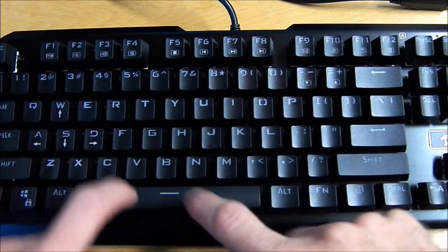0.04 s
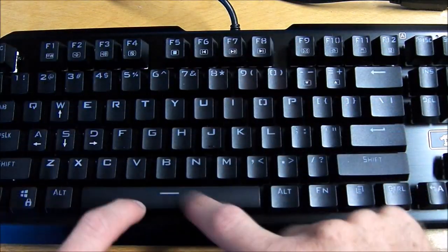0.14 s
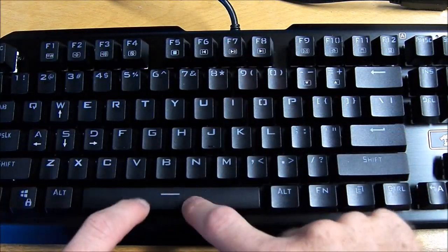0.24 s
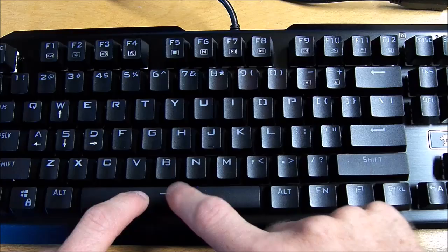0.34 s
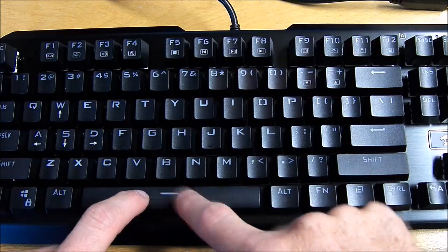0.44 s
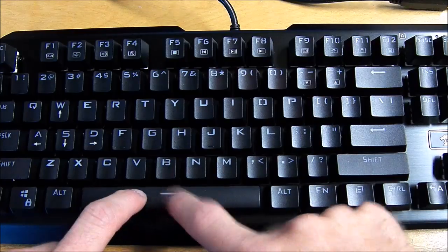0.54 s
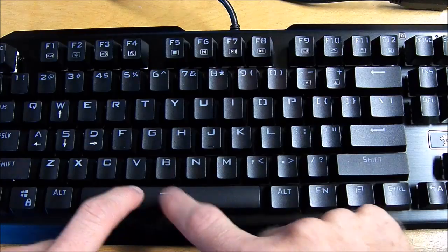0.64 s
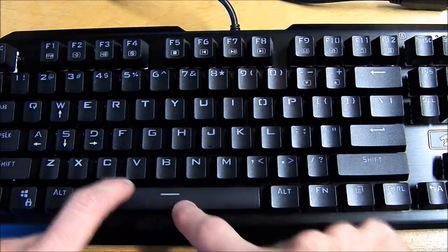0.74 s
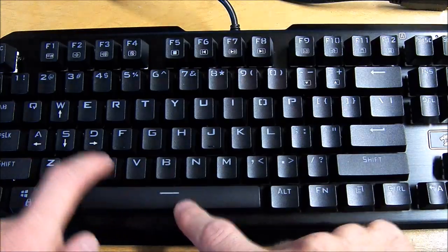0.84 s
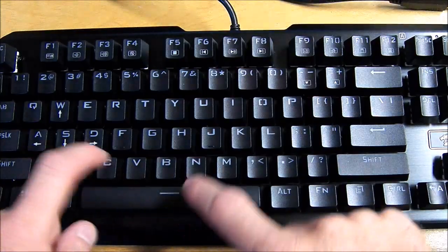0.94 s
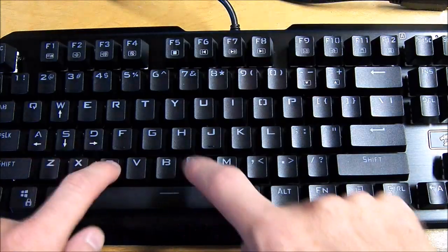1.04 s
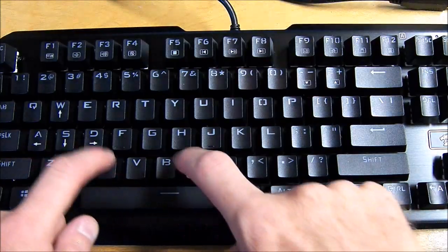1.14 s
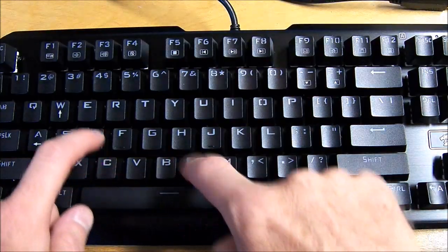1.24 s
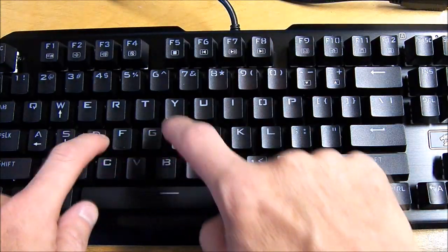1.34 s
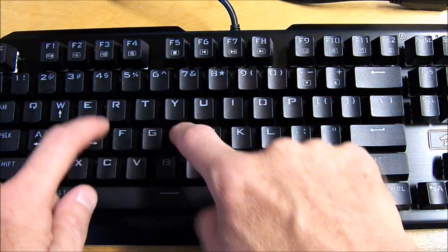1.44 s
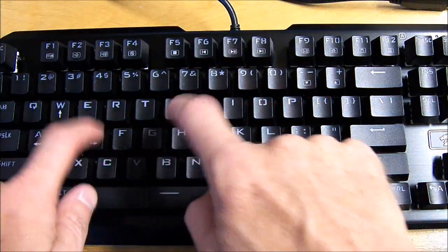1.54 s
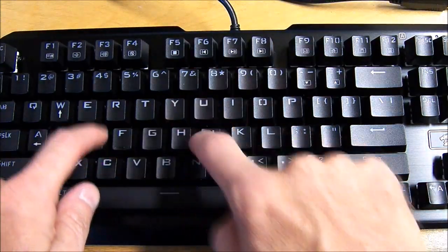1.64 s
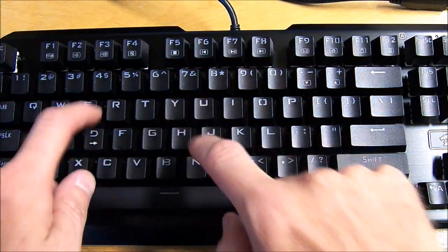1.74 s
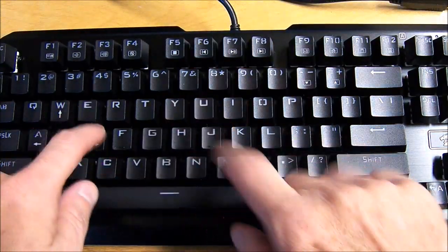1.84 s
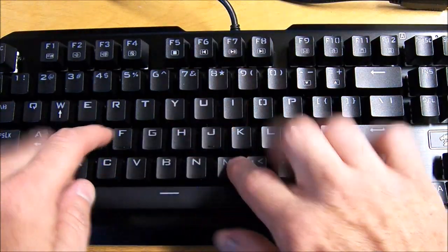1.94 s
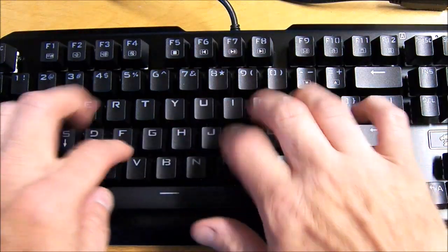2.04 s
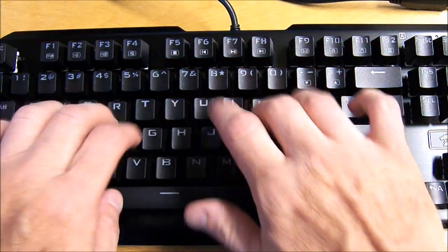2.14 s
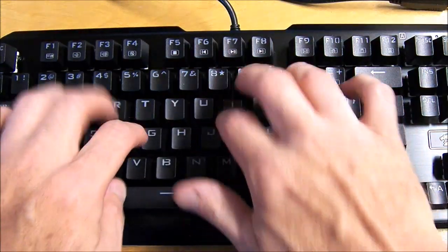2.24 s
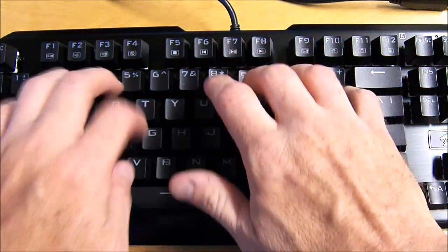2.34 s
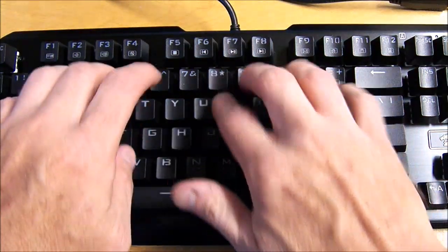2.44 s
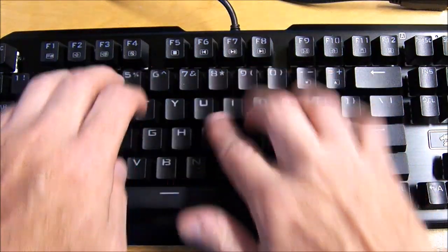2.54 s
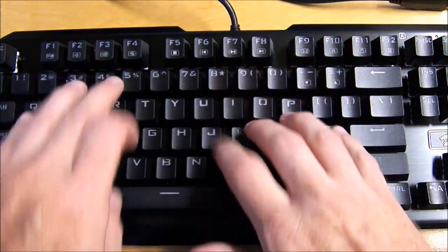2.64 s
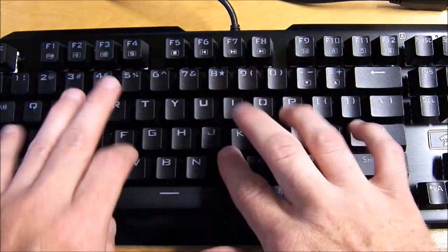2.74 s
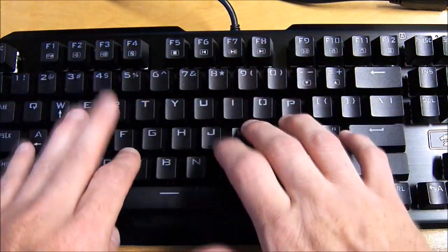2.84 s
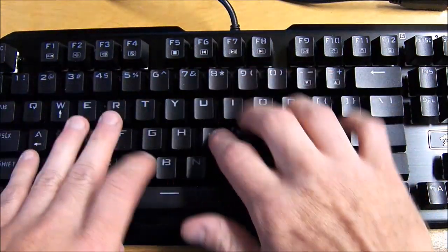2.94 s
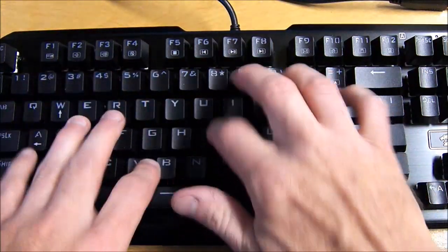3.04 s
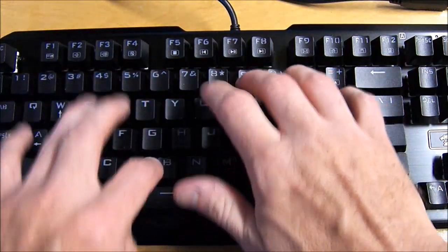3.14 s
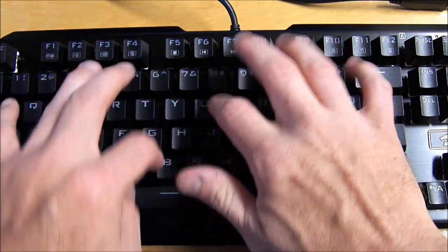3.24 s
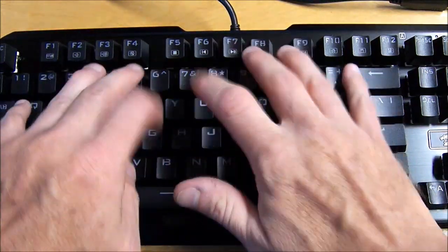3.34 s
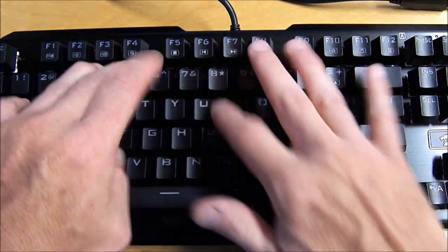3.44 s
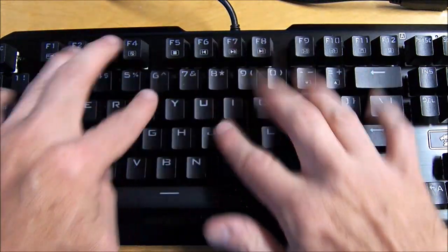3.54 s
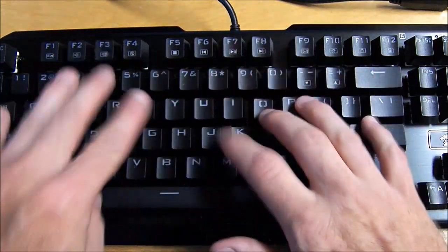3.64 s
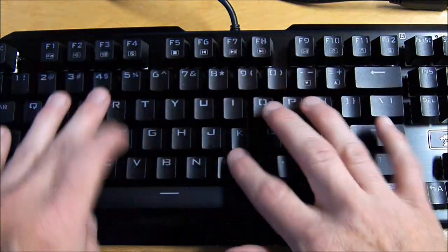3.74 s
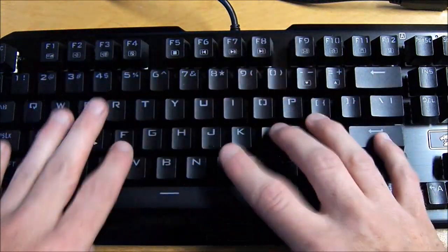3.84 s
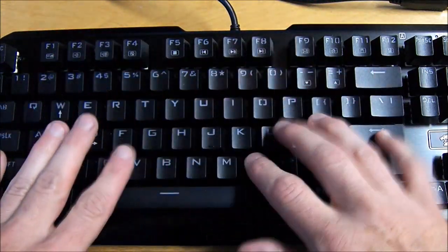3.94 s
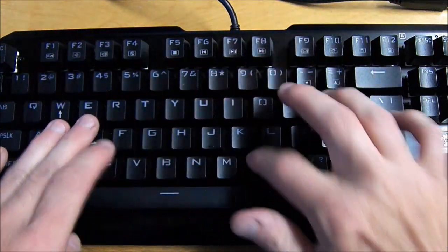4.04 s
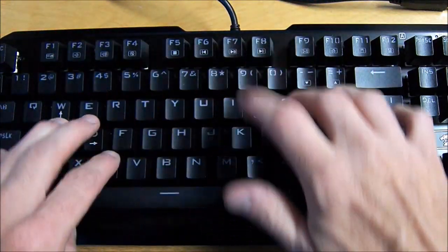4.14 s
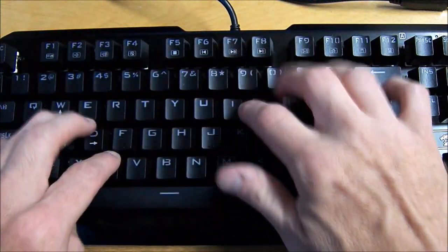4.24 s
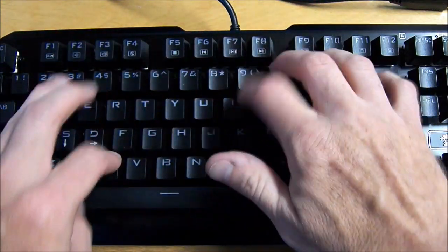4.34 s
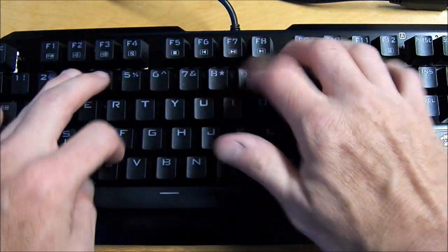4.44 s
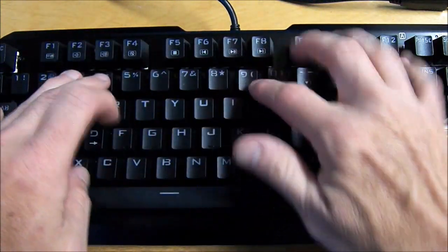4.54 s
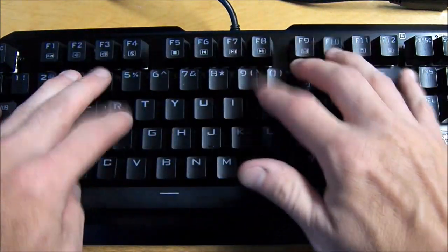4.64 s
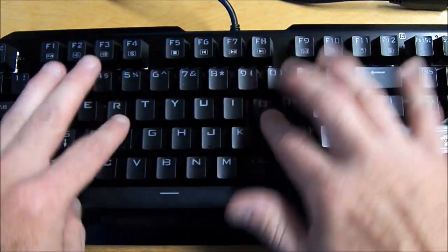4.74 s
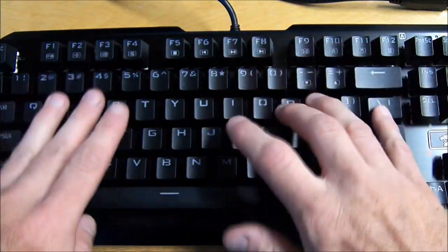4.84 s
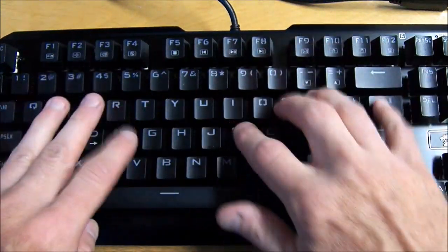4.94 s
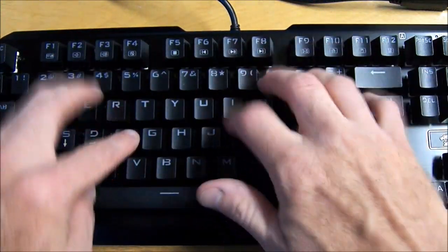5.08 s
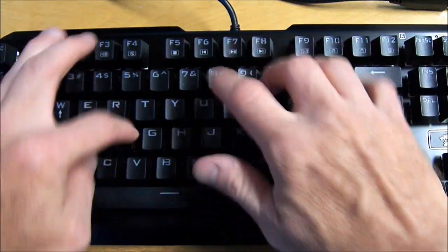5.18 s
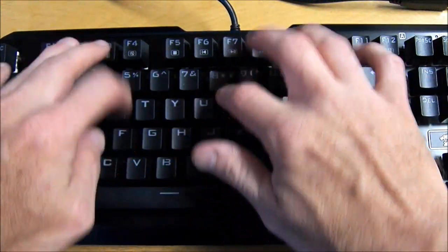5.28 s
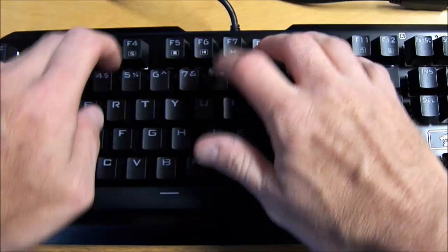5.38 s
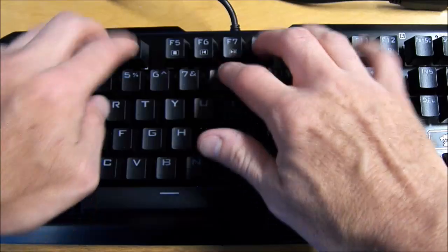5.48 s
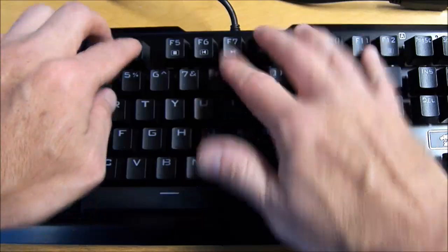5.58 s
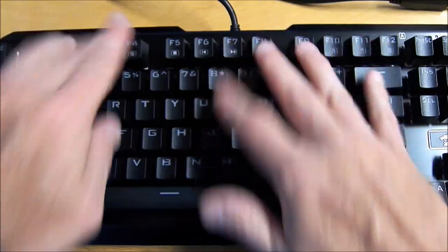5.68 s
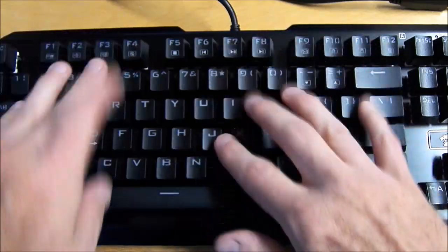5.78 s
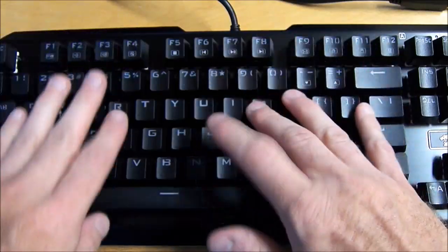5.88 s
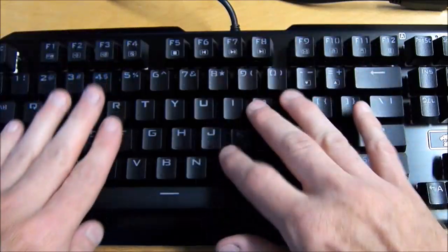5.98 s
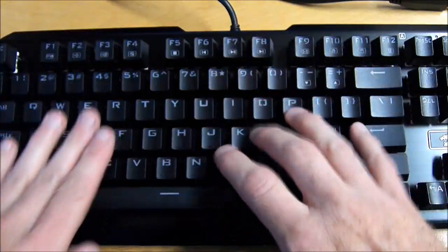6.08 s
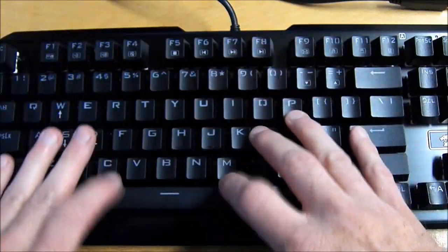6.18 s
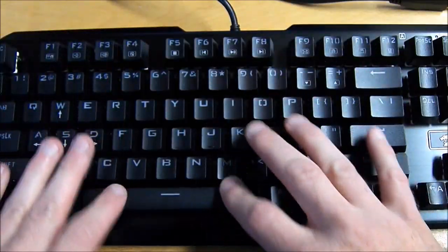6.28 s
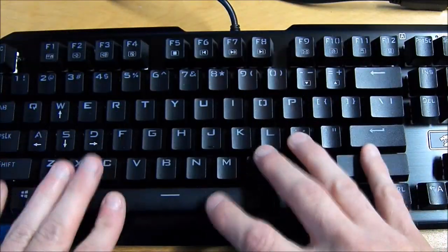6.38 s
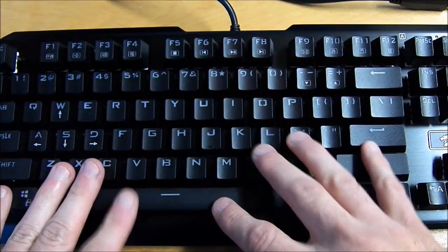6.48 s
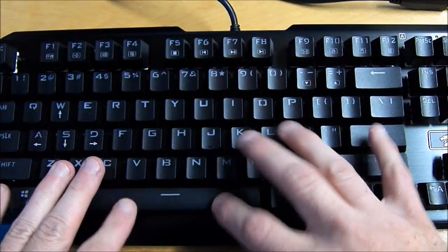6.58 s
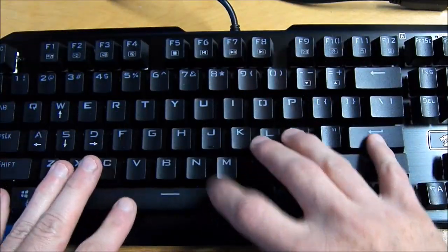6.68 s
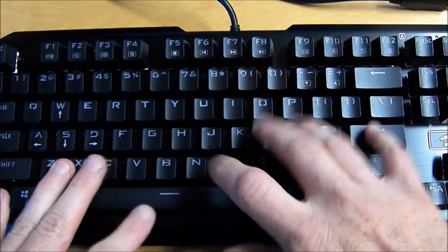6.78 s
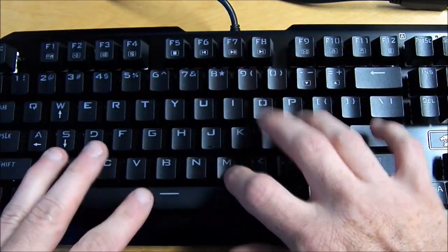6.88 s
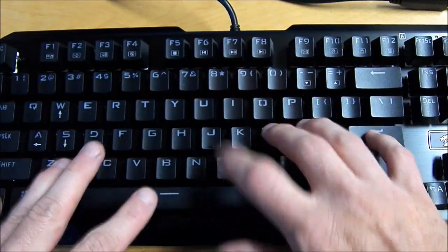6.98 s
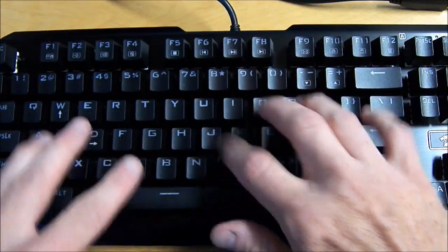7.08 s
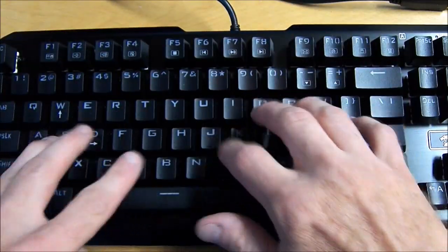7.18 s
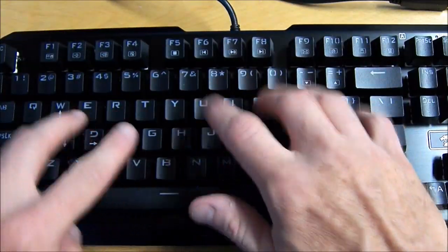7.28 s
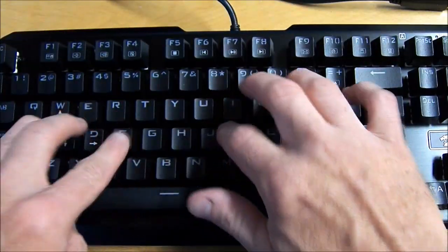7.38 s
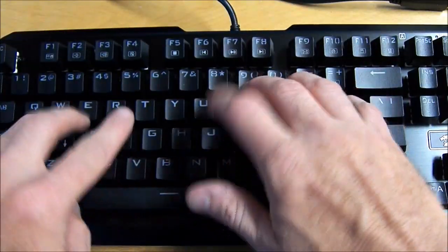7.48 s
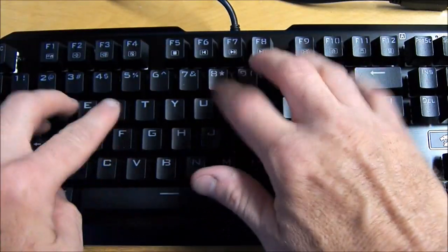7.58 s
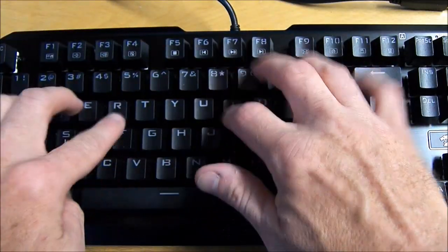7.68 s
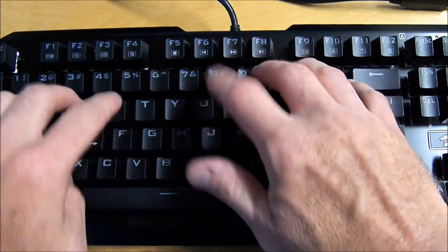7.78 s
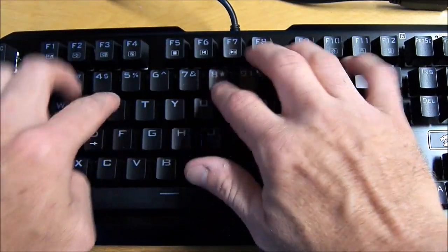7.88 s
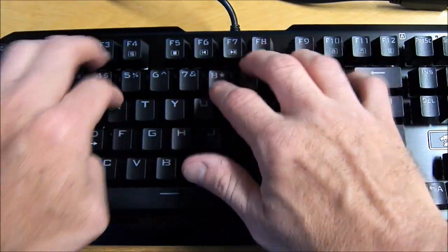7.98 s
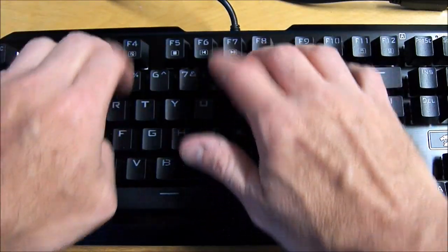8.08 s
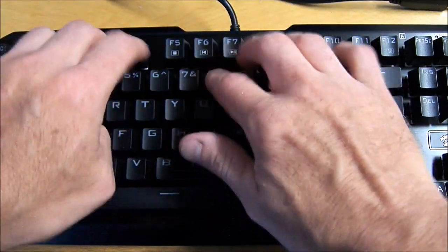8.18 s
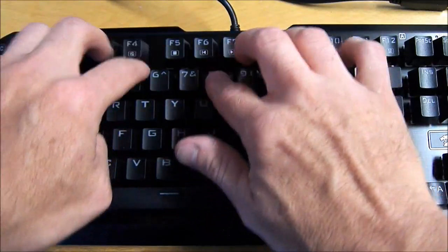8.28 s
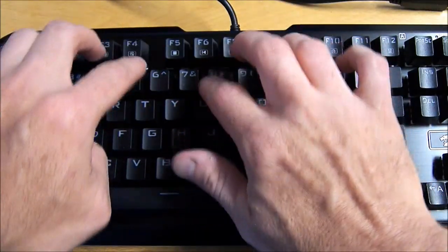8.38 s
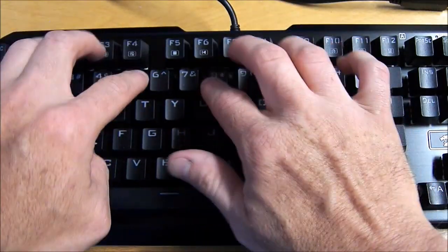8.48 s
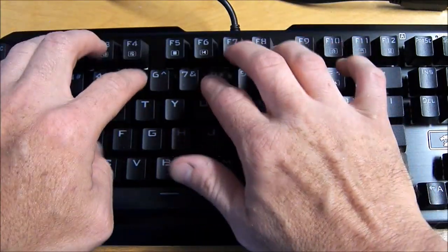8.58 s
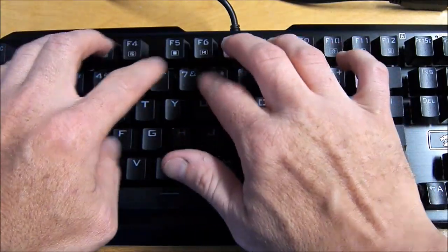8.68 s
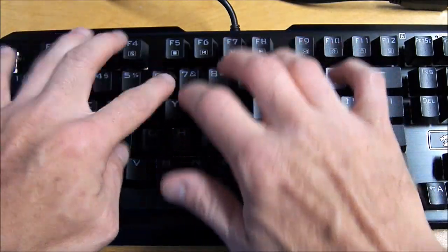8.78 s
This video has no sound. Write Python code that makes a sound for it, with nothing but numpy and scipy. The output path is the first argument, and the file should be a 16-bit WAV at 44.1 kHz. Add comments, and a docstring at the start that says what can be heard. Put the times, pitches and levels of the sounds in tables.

```python
"""A clicky mechanical keyboard, typed fast with two hands on a wooden desk, close to a stereo microphone.
Each switch snaps with a short bright click; the stem then hits its stop and cap and case clack.
Loose caps rattle under the fingers. The desk rumbles; the room echoes briefly and hums faintly."""
import sys
import numpy as np
from scipy import signal
from scipy.fft import rfft, irfft
from scipy.io import wavfile

SR = 44100
rng = np.random.default_rng(int(sys.argv[2]) if len(sys.argv) > 2 else 0)


def wrap_up_sound(samples):
    """Save the sound to the file named by the first command line argument, as 16-bit audio."""
    columns = np.atleast_2d(samples).T
    # keep every value between -1 and 1, then stretch to whole-number steps
    tamed = np.clip(columns, -1, 1)
    steps = np.round(tamed * 32767).astype(np.int16)
    wavfile.write(sys.argv[1], SR, steps)


N = 388962
TIME_S = np.arange(N) / SR
BIN_HZ = np.maximum(np.arange(N // 2 + 1) * SR / N, 1)

# switch snaps: start_s, level_db
SNAPS = [(0.015, -32.5), (0.1815, -26), (0.2496, -31), (0.3333, -23), (0.406, -36), (0.4924, -20.5),
         (0.5617, -35), (0.6594, -23.5), (0.733, -33), (0.8303, -25), (1.0999, -21.5), (1.2848, -35),
         (1.4323, -33), (1.5091, -28.5), (1.6594, -29), (1.7338, -30), (1.885, -25.5), (1.9665, -27),
         (1.9728, -23.5), (2.1715, -20.5), (2.1811, -28), (2.1866, -24), (2.2308, -21.5), (2.2705, -17),
         (2.3795, -19), (2.3858, -26), (2.3912, -16.5), (2.4557, -18.5), (2.5223, -17), (2.5299, -28),
         (2.653, -19), (2.658, -21), (2.6974, -34), (2.7092, -23.5), (2.7795, -27), (2.7851, -19.5),
         (2.9075, -23), (2.9116, -14.5), (2.9235, -21.5), (3.0338, -19.5), (3.135, -16), (3.1587, -19),
         (3.169, -15.5), (3.294, -20.5), (3.299, -27), (3.3972, -20), (3.4012, -22.5), (3.448, -24.5),
         (3.497, -28), (3.5164, -42), (3.528, -15), (3.5394, -17), (3.5856, -25.5), (3.6196, -32),
         (3.6593, -31), (3.676, -23), (3.7547, -23), (3.778, -20), (3.8084, -24.5), (3.8725, -21.5),
         (3.917, -19), (3.934, -23), (4.03, -16), (4.1855, -20), (4.228, -26.5), (4.3075, -36),
         (4.3157, -21), (4.4382, -26), (4.444, -24), (4.4542, -19.5), (4.5389, -28), (4.5542, -19.5),
         (4.6652, -32), (4.6814, -23.5), (4.687, -25), (4.7463, -22.5), (4.7703, -19), (4.8915, -15.5),
         (5.025, -25), (5.0658, -21.5), (5.1817, -23), (5.3055, -24.5), (5.3381, -21), (5.386, -24.5),
         (5.426, -23.5), (5.4333, -24), (5.548, -22), (5.5874, -20), (5.595, -14), (5.6792, -22),
         (5.7356, -35), (5.859, -19.5), (5.8712, -21), (5.9024, -21.5), (5.9188, -21.5), (5.9453, -22),
         (6.0206, -31), (6.039, -23.5), (6.064, -21.5), (6.18, -26), (6.2, -22.5), (6.2814, -17.5),
         (6.305, -20), (6.3111, -25), (6.4336, -19), (6.5163, -18.5), (6.5312, -18.5), (6.5385, -19),
         (6.603, -30), (6.7162, -22), (6.724, -20.5), (6.747, -21), (7.0165, -10), (7.1955, -18),
         (7.2517, -29), (7.278, -22), (7.282, -24), (7.2893, -14), (7.3101, -31), (7.424, -17.5),
         (7.4532, -15.5), (7.4856, -15), (7.5084, -23), (7.526, -12), (7.7087, -23.5), (7.7778, -13),
         (7.7874, -18), (7.798, -17), (7.8093, -21), (7.916, -43), (8.0043, -18), (8.0728, -13),
         (8.0998, -17), (8.1196, -16), (8.1235, -21), (8.2585, -19.5), (8.2646, -45), (8.498, -15),
         (8.5031, -45), (8.6484, -21.5)]
# switch modes, main and top: pitch_hz, level_db, t60_s (ring() floors it at 2 ms)
SWITCH_MODES = [(5220, 3, 0.0011), (6820, 4, 0.0022), (7590, 12, 0.0017), (8534, 2, 0.0083),
                (9000, -6, 0.0042)]
SWITCH_TOP_MODES = [(10570, -1.5, 0.0054), (11540, -8.5, 0.0069), (12920, -3, 0.0047), (15000, -25, 0.0037)]
# bright scratchy hiss: freq_hz, relative_db
HISS_SPECTRUM = [(2650, -14.5), (4500, -7), (5870, -14), (8550, -4), (9720, -8.5), (11000, -7),
                 (13500, -10), (16000, -15)]


def clicks():
    """The switch's sprung jacket snaps; a faint bright hiss swells just before, a scratchy tail follows."""
    out = np.zeros((2, N))
    top_spread_db = 3.5
    draws = rng.standard_normal((len(SNAPS), 3, 4, 5, 1))
    for (start_s, level_db), (main, top, key) in zip(SNAPS, draws):
        top_db = level_db + top_spread_db * key[0, 0]
        ring(out, start_s, SWITCH_MODES, level_db, main, rise_s=.0004, spread_db=1.5, detune=.03)
        ring(out, start_s, SWITCH_TOP_MODES, top_db, top, rise_s=.0004, spread_db=2.5, detune=.05)
    start_s, level_db = np.transpose(SNAPS)
    hiss_gain = swell(start_s, level_db, lead_db=-19, lead_t60_s=.086, tail_db=-15, tail_t60_s=.077)
    return out + colour(hiss_gain * ticks(per_s=12000, uneven_db=4.5), HISS_SPECTRUM)


# stems hitting their stops: start_s, wall_db, hollow_db, hollow_hz
LANDINGS = [(0.0163, -37.5, -29, 1162), (0.1817, -33, -32.5, 1070), (0.2492, -27.5, -24.5, 1307),
            (0.3312, -54, -22.5, 1130), (0.4041, -25.5, -23, 1285), (0.4934, -23.5, -19.5, 1157),
            (0.5619, -26.5, -24, 1267), (0.66, -25, -26, 1360), (0.7339, -31.5, -27.5, 1187),
            (0.8355, -29, -24.5, 1187), (0.9412, -35, -34.5, 1156), (1.1017, -30.5, -33, 1193),
            (1.1967, -44, -34, 1166), (1.2843, -27.5, -34, 1150), (1.3617, -41, -32, 1140),
            (1.4333, -31.5, -29.5, 1263), (1.5104, -30, -33.5, 1170), (1.5832, -47, -33.5, 1186),
            (1.663, -31, -31.5, 1240), (1.7334, -27, -27.5, 1130), (1.814, -42, -31.5, 1164),
            (1.8913, -34, -36, 1270), (1.9719, -30.5, -48, 1090), (2.071, -66, -41, 1194),
            (2.1298, -49, -34.5, 1136), (2.1836, -35, -39, 1340), (2.241, -34.5, -32, 1260),
            (2.2712, -35, -19, 1240), (2.2913, -40, -30.5, 1120), (2.3536, -39, -24, 1295),
            (2.391, -27, -48, 1190), (2.401, -40, -33, 1125), (2.458, -24.5, -23, 1170),
            (2.4691, -28.5, -34, 1225), (2.5227, -24.5, -24.5, 1094), (2.5538, -49, -38, 1204),
            (2.611, -63, -44, 1260), (2.6581, -24.5, -26, 1105), (2.7093, -51, -59, 1140),
            (2.7573, -58, -34.5, 1180), (2.7862, -31, -35, 1260), (2.8005, -47, -28, 1074),
            (2.9168, -30.5, -22, 1220), (2.9802, -64, -24.5, 1190), (2.995, -59, -27, 1150),
            (3.0246, -45, -27, 1230), (3.0394, -30, -24, 1158), (3.0523, -45, -25.5, 1116),
            (3.1344, -50, -45, 1200), (3.1578, -39, -37, 1280), (3.172, -24, -33, 1260),
            (3.1867, -48, -28.5, 1120), (3.3045, -36.5, -35, 1120), (3.3902, -34, -33, 1180),
            (3.398, -26, -29, 1360), (3.4109, -30, -23.5, 1224), (3.4595, -35, -44, 1130),
            (3.5005, -43, -25, 1280), (3.5162, -27.5, -26, 1260), (3.5307, -30.5, -25.5, 1247),
            (3.577, -45, -20.5, 1220), (3.5983, -38, -30, 1180), (3.6186, -30.5, -27.5, 1124),
            (3.6591, -29, -20, 1260), (3.8077, -35, -30, 1085), (3.8383, -56, -36.5, 1160),
            (3.88, -33, -35.5, 1224), (3.917, -29.5, -41, 1220), (4.0296, -26, -32, 1233),
            (4.0618, -38, -31, 1230), (4.1809, -28.5, -21.5, 1236), (4.1875, -27, -36, 1170),
            (4.3131, -24.5, -34, 1214), (4.4439, -25.5, -35, 1213), (4.5309, -29, -20, 1300),
            (4.5571, -27, -24, 1290), (4.5769, -60, -24, 1172), (4.6666, -33, -55, 1090),
            (4.7529, -32, -27, 1280), (4.7671, -27, -19, 1370), (4.7746, -27.5, -24, 1158),
            (4.8922, -27.5, -22, 1263), (4.9632, -40.5, -56, 1300), (5.03, -33.5, -35.5, 1094),
            (5.0622, -36, -29, 1220), (5.073, -43, -30.5, 1300), (5.1631, -46, -24, 1134),
            (5.1756, -25.5, -35, 1200), (5.1855, -26.5, -36, 1240), (5.307, -28.5, -36, 1203),
            (5.3393, -34, -31, 1220), (5.3552, -58, -29, 1170), (5.4295, -26, -23.5, 1240),
            (5.4383, -27.5, -38, 1190), (5.449, -32, -39, 1160), (5.5418, -27.5, -29.5, 1260),
            (5.5955, -32.5, -28.5, 1160), (5.6789, -32, -20, 1166), (5.7345, -48, -32, 1130),
            (5.8261, -41, -25.5, 1210), (5.8414, -33, -32, 1140), (5.8735, -37, -34, 1186),
            (5.9085, -28.5, -33, 1190), (5.9213, -33, -26, 1270), (5.9303, -48, -26, 1201),
            (6.0417, -28.5, -27, 1050), (6.102, -58, -31.5, 1090), (6.166, -33.5, -36, 1106),
            (6.1747, -49, -31, 1130), (6.1852, -25.5, -27, 1108), (6.2815, -37, -45, 1180),
            (6.3093, -26, -26, 1110), (6.3437, -32, -24.5, 1257), (6.434, -29, -20, 1190),
            (6.5307, -40, -55, 1160), (6.5367, -41, -55, 1210), (6.604, -30, -22.5, 1200),
            (6.6094, -43, -33, 1170), (6.7241, -25.5, -39, 1140), (6.7542, -27, -31, 1230),
            (6.8705, -29.5, -19, 1096), (6.9015, -47, -29, 1126), (6.9921, -45, -27, 1180),
            (7.0062, -41, -28, 1145), (7.022, -25, -30, 1266), (7.0264, -28, -40, 1260),
            (7.035, -29, -38, 1260), (7.0612, -33.5, -26.5, 1152), (7.065, -51, -46, 1180),
            (7.135, -50, -23.5, 1235), (7.1924, -36, -21.5, 1154), (7.201, -42, -25, 1153),
            (7.2511, -26, -33, 1240), (7.3102, -41, -16.5, 1146), (7.3746, -42, -23.5, 1167),
            (7.4202, -38, -25.5, 1157), (7.485, -37, -46, 1130), (7.502, -45, -31, 1350),
            (7.5087, -29.5, -34, 1280), (7.5248, -33, -25.5, 1320), (7.5315, -25.5, -45, 1370),
            (7.538, -31, -37, 1210), (7.5568, -33, -23, 1150), (7.636, -49, -29.5, 1110),
            (7.651, -38, -28.5, 1300), (7.678, -56, -39, 1150), (7.7007, -40, -28, 1237),
            (7.7148, -38, -37, 1240), (7.7925, -25, -25.5, 1170), (7.8018, -26, -26, 1350),
            (7.8399, -32, -24, 1140), (7.9133, -30, -32, 1290), (7.9279, -40, -25, 1120),
            (7.9503, -46, -28, 1125), (7.9602, -40, -23.5, 1106), (8.0041, -32.5, -42, 1130),
            (8.0168, -36, -49, 1090), (8.071, -39, -48, 1190), (8.086, -32, -31, 1280),
            (8.111, -26.5, -37, 1260), (8.1241, -38.5, -41, 1320), (8.1321, -28.5, -29, 1274),
            (8.155, -47, -22, 1225), (8.2133, -30, -27, 1140), (8.2643, -26.5, -31, 1100),
            (8.277, -45, -37, 1280), (8.3734, -61, -28, 1210), (8.5007, -27, -33, 1097),
            (8.6533, -29.5, -33.5, 1120), (8.768, -38, -32.5, 1075)]
# cap hollow modes: pitch_ratio, level_db, t60_s
HOLLOW_MODES = [(0.934, -0.5, 0.045), (0.998, 1.5, 0.034), (1.02, -4, 0.076), (1.124, 4, 0.031)]
# plate, cap wall, case and space bar modes: pitch_hz, level_db, t60_s
PLATE_MODES = [(1753, -2.5, 0.013), (2180, 1, 0.015), (2335, -1, 0.014)]
CAP_WALL_MODES = [(3290, -2, .012), (3850, 1.5, 0.019), (4505, 1, 0.0075), (5390, -1, 0.0067)]
CASE_MODES = [(413, -19.5, 0.028), (568, -24.5, 0.067), (881, -6, 0.028)]
SPACE_BAR_MODES = [(196, -24.5, 0.14), (439, -10.5, 0.059), (5060, 13.5, 0.0033), (793, -8, 0.015)]


def clacks():
    """The stem lands: plate and cap walls crack, the switch jolts, the hollow rings, the case booms."""
    out = np.zeros((2, N))
    draws = rng.standard_normal((len(LANDINGS), 6, 4, 4, 1))
    for landing, (hollow, plate, wall, case, bar, switch) in zip(LANDINGS, draws):
        start_s, wall_db, hollow_db, hollow_hz = landing
        plate_db = wall_db + .77 * (hollow_db - wall_db)
        jolt_db = wall_db + .5
        ring(out, start_s, PLATE_MODES, plate_db, plate, rise_s=.0009, spread_db=4.5, detune=.06)
        ring(out, start_s, CAP_WALL_MODES, wall_db, wall, rise_s=.0002, spread_db=3, detune=.04)
        ring(out, start_s, SWITCH_TOP_MODES, jolt_db, switch, rise_s=.0004, spread_db=3, detune=.08)
        ring(out, start_s + .00035, HOLLOW_MODES, hollow_db, hollow,
             rise_s=.003, spread_db=2.5, detune=.015, pitch_scale=hollow_hz)
        ring(out, start_s, CASE_MODES, hollow_db, case, rise_s=.003, spread_db=3, detune=.03)
        if .17 < start_s < 1.0:   # thumbs drum the space bar
            ring(out, start_s, SPACE_BAR_MODES, hollow_db, bar, rise_s=.0008, spread_db=3, detune=.04)
    return out


# midrange rattle: freq_hz, relative_db
RATTLE_SPECTRUM = [(350, -46), (600, -25.5), (859, -12), (959, -18), (1050, -4.5), (1270, -8),
                   (1890, -13.5), (2150, -9.5), (2930, -15), (3790, -12.5), (5270, -22), (6500, -19),
                   (8450, -22), (14300, -120)]


def rattle(brush_db):
    """A soft hiss swells just before each landing; caps rattle after it and under brushing fingertips."""
    start_s, wall_db, hollow_db, _ = np.transpose(LANDINGS)
    mid_db = np.maximum(wall_db, hollow_db - 8)
    mid_gain = swell(start_s, mid_db, lead_db=-15, lead_t60_s=.08, tail_db=-2, tail_t60_s=.074)
    treble_db = np.maximum(wall_db, hollow_db - 9.5) - 15
    treble_gain = swell(start_s, treble_db, lead_db=3.5, lead_t60_s=.08, tail_db=3, tail_t60_s=.067)
    mids = (mid_gain + from_db(brush_db)) * ticks(per_s=2500, uneven_db=2.26)
    treble = (treble_gain + from_db(brush_db - 10)) * ticks(per_s=8300, uneven_db=1.6)
    return colour(mids, RATTLE_SPECTRUM) + colour(treble, HISS_SPECTRUM)


def chatter(brush_db):
    """Fingers knock loose caps at random, loudest near a snap; hollow, wall and plate ring."""
    out = np.zeros((2, N))
    knocks_per_s, spread_db = 50, 3.5
    knocks = np.flatnonzero(rng.random(N) < knocks_per_s / SR)
    snap_s, _ = np.transpose(SNAPS)
    stir = swell(snap_s, 0, lead_db=0, lead_t60_s=.08, tail_db=0, tail_t60_s=.52)
    knock_db = brush_db + 20 * np.log10(np.minimum(stir, 1)) + 17
    tick_modes = PLATE_MODES[1:2] + CAP_WALL_MODES[:3]
    draws = rng.standard_normal((len(knocks), 3, 4, 4, 1))
    for at, (hollow, tick, key) in zip(knocks, draws):
        hollow_hz = 1198 * (1 + .047 * key[0, 0])
        hollow_db = knock_db[at] + spread_db * key[1, 0]
        tick_db = knock_db[at] - 7.5 + spread_db * key[2, 0]
        ring(out, at / SR, HOLLOW_MODES, hollow_db, hollow,
             rise_s=.002, spread_db=3, detune=.03, pitch_scale=hollow_hz)
        ring(out, at / SR, tick_modes, tick_db, tick, rise_s=.0003, spread_db=4, detune=.08)
    return out


# wooden desk: freq_hz, relative_db
DESK_SPECTRUM = [(30, -36), (52, -26), (70, -1.5), (90, -8), (118, 1.5), (150, -4), (190, -0.5),
                 (255, -29.5), (400, 1.5), (520, -8.5), (700, -11.5), (1000, -29)]


def desk_rumble(level_db):
    """The desk rumbles under the working hands."""
    return from_db(level_db) * colour(rng.standard_normal((2, N)), DESK_SPECTRUM)


# wall reflections: freq_hz, relative_db
ECHO_SPECTRUM = [(100, 12), (700, 7.5), (1100, -16), (3000, 0), (16000, -4)]


def room_echoes(mono, level_db=-10.5, t60_s=.15, gap_s=.003):
    """Dense, fast-dying echoes from desk and walls."""
    decay = from_db(-60 * np.minimum(TIME_S, 1) / t60_s) * (TIME_S > gap_s)
    response = colour(rng.standard_normal((2, N)) * decay, ECHO_SPECTRUM)[:, :SR // 2]
    response /= np.sqrt(np.sum(response[0] ** 2))
    return from_db(level_db) * signal.fftconvolve(mono[None], response, axes=1)[:, :N]


# room tone: freq_hz, relative_db
HUM_SPECTRUM = [(150, -48), (250, 15), (386, 23), (607, 17), (674, -27), (748, 20), (1530, -44),
                (1820, -66), (3910, -44), (16000, -61)]


def room_hum(level_db=-65.5):
    """Faint steady room tone: low-mid noise."""
    return from_db(level_db) * colour(rng.standard_normal((2, N)), HUM_SPECTRUM)


# left-right likeness: freq_hz, correlation
STEREO_CORRELATION = [(30, 0.76), (150, 0.99), (300, 0.7), (1100, 0.91), (2200, 0.45), (8000, 0.1),
                      (12500, -0.21)]


def ring(out, start_s, modes, level_db, draws, rise_s, spread_db, detune, pitch_scale=1):
    """Add one blow's damped modes; normal draws vary each one's pitch, level, phase and stereo angle."""
    pitch, mode_db, t60_s = np.transpose(modes)[:, :, None]
    pitch_draw, level_draw, phase_draw, stereo_draw = draws[:, :len(modes)]
    t60_s = np.clip(t60_s, .002, .2)
    t = np.arange(round(.7 * t60_s.max() * SR)) / SR
    pitch_hz = np.clip(pitch * pitch_scale * (1 + detune * pitch_draw), 50, .45 * SR)
    decay = from_db(level_db + mode_db + spread_db * level_draw - 60 * t / t60_s)
    envelope = decay * (1 - np.exp(-t / rise_s))
    phase_rad = 2 * np.pi * pitch_hz * t + .54 * phase_draw
    stereo_rad = np.arccos(at_hz(STEREO_CORRELATION, pitch_hz)) * stereo_draw / 2
    at = max(round(start_s * SR), 0)
    for channel, sign in enumerate((1, -1)):
        blow = np.sum(envelope * np.sin(phase_rad + sign * stereo_rad), axis=0)
        out[channel, at:at + len(t)] += blow[:N - at]


def colour(white_pair, spectrum):
    """Shape two independent white signals into partly correlated stereo at unchanged power."""
    mid, side = rfft(white_pair) * rms_one(from_db(at_hz(spectrum, BIN_HZ)))
    correlation = at_hz(STEREO_CORRELATION, BIN_HZ)
    stereo = np.sqrt(1 + correlation) * mid + np.sqrt(1 - correlation) * side * [[1], [-1]]
    return irfft(stereo, N) / np.sqrt(2)


def swell(contact_s, level_db, lead_db, lead_t60_s, tail_db, tail_t60_s):
    """Gain that rises to each contact and dies after it; powers add."""
    power = np.full(N, 1e-18)
    np.add.at(power, (contact_s * SR).astype(int), from_db(level_db) ** 2)
    lead_pole, tail_pole = from_db(-120 / (np.array([lead_t60_s, tail_t60_s]) * SR))
    lead = signal.lfilter([1], [1, -lead_pole], power[::-1])[::-1]
    tail = signal.lfilter([1], [1, -tail_pole], power)
    return np.sqrt(from_db(2 * lead_db) * lead + from_db(2 * tail_db) * tail)


def ticks(per_s, uneven_db):
    """Two independent trains of uneven ticks, rms 1."""
    sizes = from_db(uneven_db * np.minimum(rng.exponential(1, (2, N)), 4))
    signs = rng.choice([-1, 1], (2, N))
    hits = rng.random((2, N)) < per_s / SR
    return rms_one(sizes * signs * hits)


def at_hz(table, freq_hz):
    """Interpolate (freq_hz, value) rows on a log-frequency axis."""
    table_hz, values = np.transpose(table)
    return np.interp(np.log(freq_hz), np.log(table_hz), values)


def from_db(db):
    return 10 ** (np.asarray(db) / 20)


def rms_one(x):
    return x / np.sqrt(np.mean(x ** 2) + 1e-20)


# hands brushing the caps and shaking the desk: time_s, brush_db, rumble_db
HAND_LEVELS = [(0.0, -75, -63), (0.44, -61, -52), (0.98, -73, -58.5), (2.06, -66.5, -64),
               (2.36, -53, -52.5), (3.32, -64, -57), (3.68, -54.5, -54), (3.93, -58.5, -61),
               (4.9, -58, -57), (6.14, -57.5, -57), (6.95, -57, -49), (7.35, -53.5, -56),
               (8.18, -56, -50.5), (8.46, -47.5, -52.5), (8.56, -72, -56.5), (8.82, -64, -52.5)]


def scene():
    """Keys and their echoes over desk rumble and room tone."""
    time_s, brush_db, rumble_db = np.transpose(HAND_LEVELS)
    brush_db = np.interp(TIME_S, time_s, brush_db)
    rumble_db = np.interp(TIME_S, time_s, rumble_db)
    keys = clicks() + clacks() + rattle(brush_db) + chatter(brush_db)
    return keys + desk_rumble(rumble_db) + room_hum() + room_echoes(keys.mean(axis=0))


# microphone balance: freq_hz, left_minus_right_db
MIC_BALANCE = [(100, -.6), (500, -1.1), (1200, -3.2), (2500, -1.7), (4500, 0), (8500, -.4), (12500, 2.6)]


def record(dry):
    """The microphone's two ports differ in colour; deep bass and extreme treble are cut."""
    bass_cut_hz, treble_stop_hz = 63, 16900
    port_db = at_hz(MIC_BALANCE, BIN_HZ) / 2 * np.array([[1], [-1]])
    ports = irfft(rfft(dry) * from_db(port_db), N)
    highpass = signal.butter(3, bass_cut_hz, "high", fs=SR, output="sos")
    lowpass = signal.cheby2(12, 70, treble_stop_hz, fs=SR, output="sos")
    return signal.sosfilt(lowpass, signal.sosfilt(highpass, ports))


dry = scene()
out = record(dry)
wrap_up_sound(out)
```